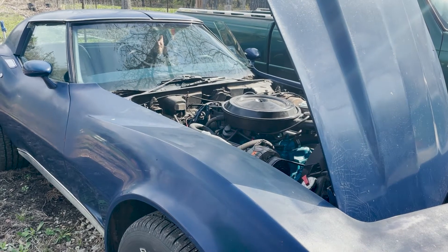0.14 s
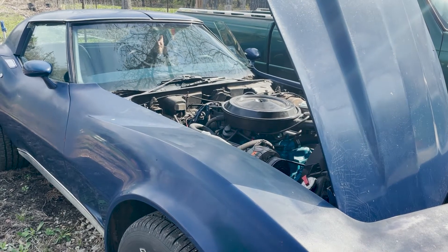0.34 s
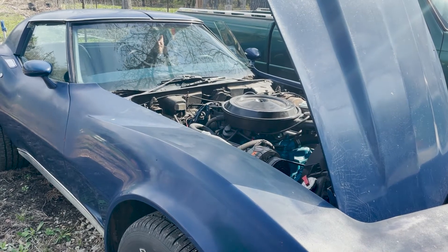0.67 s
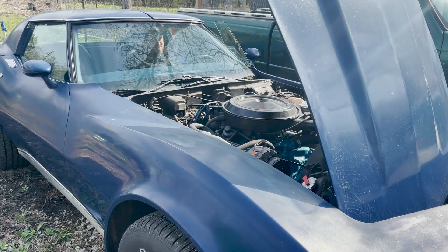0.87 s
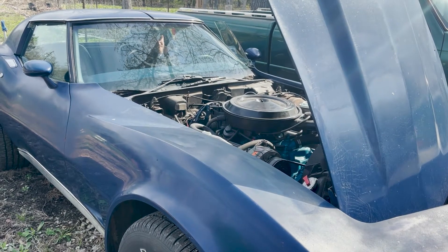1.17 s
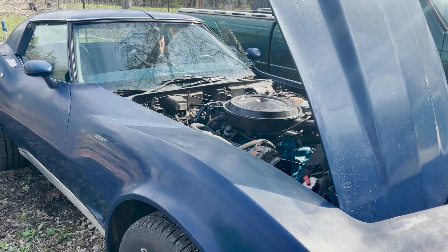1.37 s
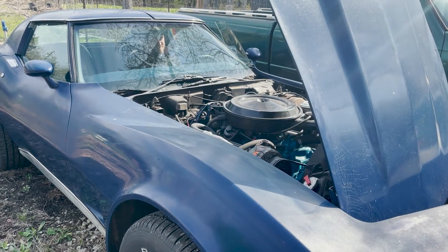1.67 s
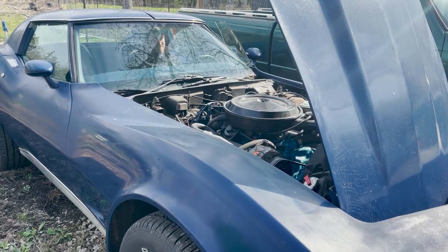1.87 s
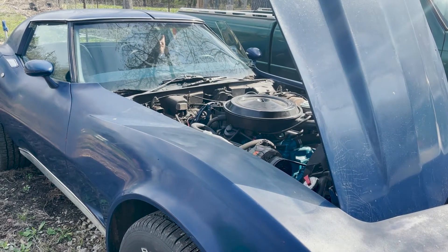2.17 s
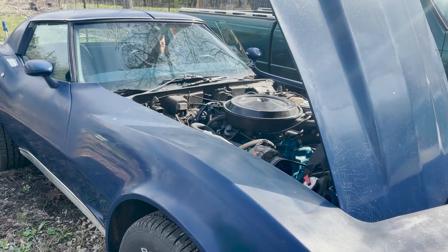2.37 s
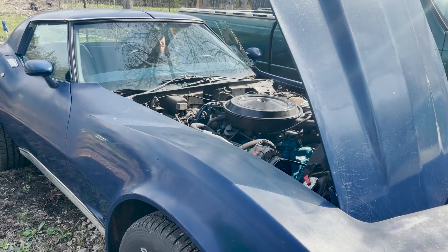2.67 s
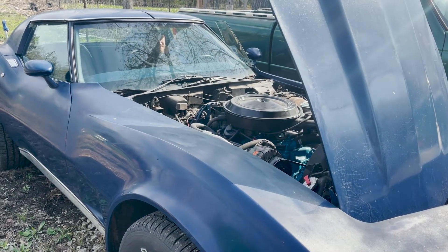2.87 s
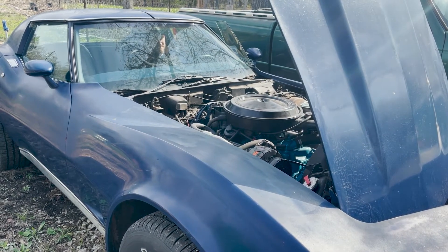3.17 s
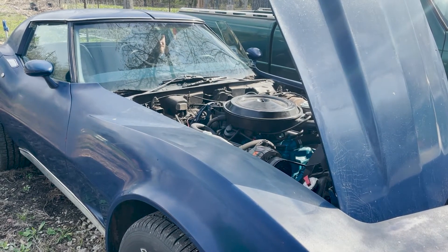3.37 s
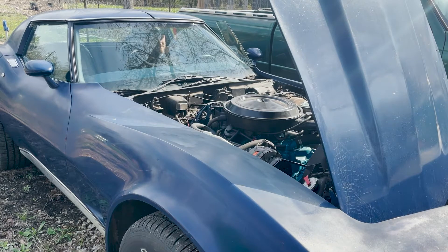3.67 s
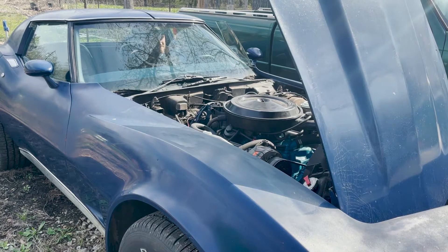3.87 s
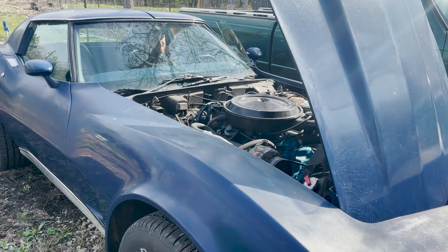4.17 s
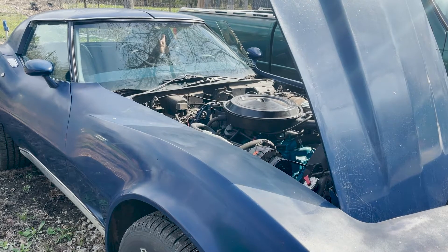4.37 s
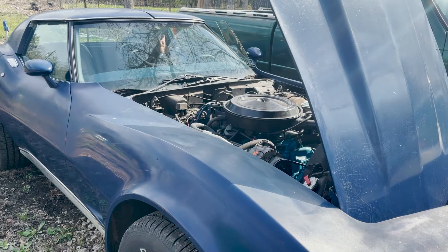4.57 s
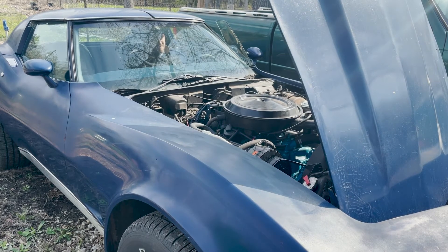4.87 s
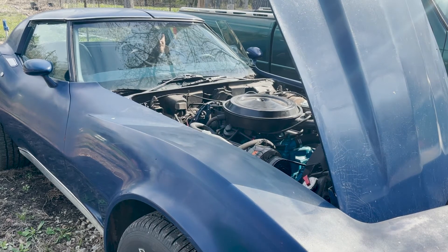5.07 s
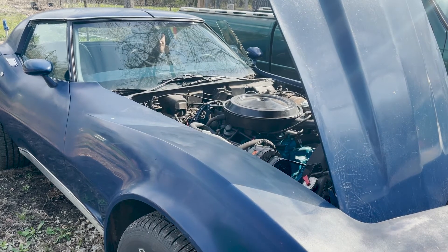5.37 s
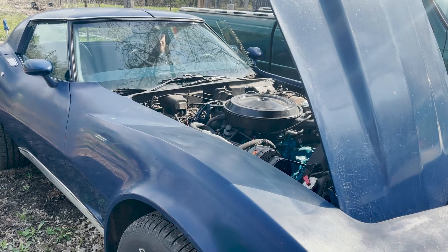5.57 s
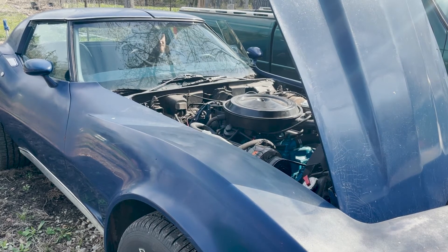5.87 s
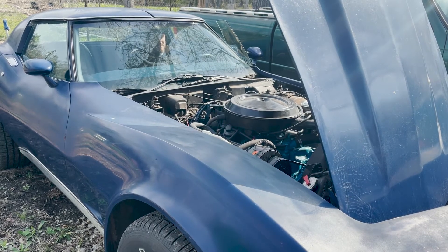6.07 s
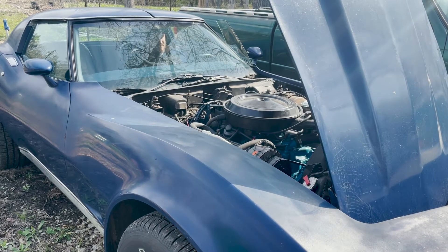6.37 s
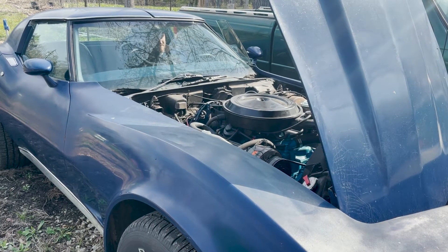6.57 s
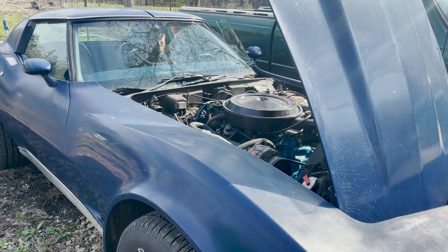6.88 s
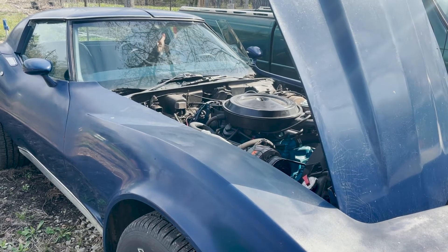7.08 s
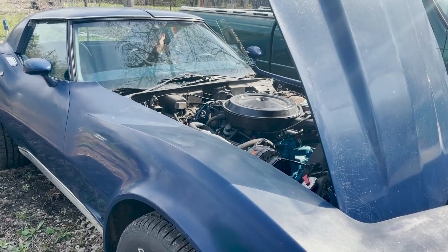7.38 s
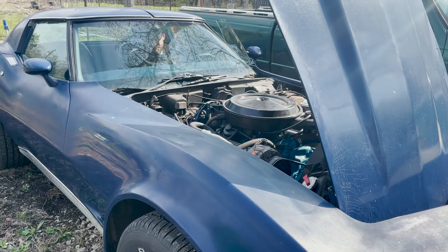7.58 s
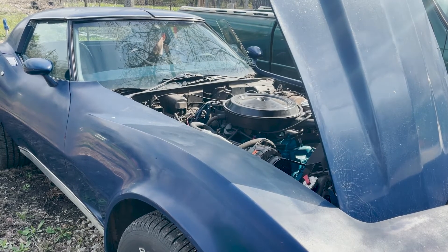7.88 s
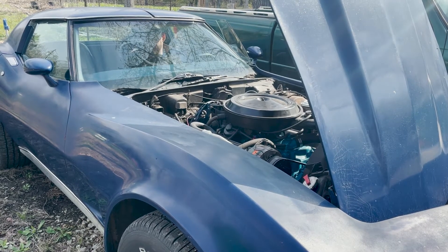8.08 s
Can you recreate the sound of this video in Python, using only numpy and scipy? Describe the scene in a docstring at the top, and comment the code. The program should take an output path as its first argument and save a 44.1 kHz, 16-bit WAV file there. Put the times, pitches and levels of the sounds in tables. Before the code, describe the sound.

A big petrol V8 idles roughly, stumbles and knocks, nearly stalls, then catches with two throttle blips.

```python
"""A yard, a phone's two microphones a few metres from a big petrol eight-cylinder with its hood open.
It idles unevenly from the start: exhaust pulses boom in the pipes, the block clatters, the carburettor
hisses and the valve gear taps. It stumbles on weak cylinders, sags and spits near 2 s, and picks up.
Then it sinks again, a slack lifter knocking, and nearly stalls just after 6 s. Two throttle blips,
near 6.6 and 7.4 s, catch it and set the hood drumming."""
import sys
import numpy as np
from scipy import signal
from scipy.fft import rfft, irfft
from scipy.io import wavfile
from scipy.ndimage import uniform_filter1d

SR = 44100
rng = np.random.default_rng(int(sys.argv[2]) if len(sys.argv) > 2 else 0)


def digitize_waveform(pressure):
    """Quantize a signal to 16-bit integers and store it at the path in sys.argv[1].

    Rows of a 2-D input are taken as channels; values are limited to [-1, 1].
    """
    field = np.atleast_2d(pressure).T
    bounded = np.clip(field, -1, 1)
    quanta = np.round(bounded * 32767).astype(np.int16)
    wavfile.write(sys.argv[1], SR, quanta)


N = 363384
TIME = np.arange(N) / SR
BIN_HZ = np.maximum(np.fft.rfftfreq(N, 1 / SR), 1)
IDLE_HZ = 47  # firings a second


def undb(db):
    """Decibels to gain."""
    return 10 ** (np.asarray(db) / 20)


def unit(x):
    """Scale to rms 1."""
    return x / np.sqrt(np.mean(x ** 2))


def over_time(table):
    """A (time, value) table read at every sample."""
    return np.interp(TIME, *np.transpose(table))


def over_hz(table):
    """A (frequency, value) table read at every frequency bin."""
    hz, value = np.transpose(table)
    return np.interp(np.log(BIN_HZ), np.log(np.maximum(hz, 1)), value)


def shaped(x, gain):
    """Multiply the spectrum by a gain a bin."""
    return irfft(rfft(x) * gain, N)


def noise(colour):
    """Noise of rms 1, coloured by a gain a bin."""
    return unit(shaped(rng.standard_normal(N), colour))


def lowpass(hz):
    """Complex response of a one-pole low-pass."""
    return 1 / (1 + 1j * BIN_HZ / hz)


def highpass(hz):
    """Complex response of a one-pole high-pass."""
    return 1 - lowpass(hz)


def resonance(hz, width_hz):
    """Complex response of a band-pass, gain 1 at the centre."""
    return 1 / (1 + 1j * (BIN_HZ ** 2 - hz ** 2) / (BIN_HZ * width_hz))


def modes(table):
    """Sum of resonances with alternating sign."""
    return sum((-1) ** k * undb(db) * resonance(f, w) for k, (f, w, db) in enumerate(table))


def walk(rate):
    """Random levels held 1 / rate s and smoothed twice; rms 1."""
    hold = int(SR / rate)
    steps = np.repeat(rng.standard_normal(N // hold + 1), hold)
    return unit(uniform_filter1d(uniform_filter1d(steps, hold), hold)[:N])


def bursts(events, rise_s, fall_s, samples):
    """An envelope that jumps and dies away at each (time, level) row."""
    envelope, t = np.zeros(N), TIME[:samples]
    for s, db in events:
        envelope[int(s * SR):][:samples] += undb(db) * (1 - np.exp(-t / rise_s)) * np.exp(-t / fall_s)
    return envelope


def crossings(cycles):
    """Samples at which a running count passes a whole number."""
    return np.flatnonzero(np.diff(np.floor(cycles)))


def pull(hz):
    """How hard the engine pulls, 0-1: follows the crank's gain in speed, a little late."""
    lag_s, hard_hz_per_s = .091, 116
    keep = np.exp(-1 / (lag_s * SR))
    acceleration = signal.lfilter([1 - keep], [1, -keep], np.gradient(hz) * SR)
    return np.tanh(np.maximum(acceleration, 0) / hard_hz_per_s)


def cylinders(hz, firings):
    """A pressure pulse per firing, weaker and less even as the engine sags."""
    # exhaust thumps fall slightly later from about 5 to 6 s: (time [s], delay [firing intervals])
    thump_delay = [(4.75, 0), (4.95, 0.42), (6.0, 0.434), (6.12, 0)]
    # cylinders in firing order: (burn strength [dB])
    cylinder_db = [0.6, -1.5, 0.6, 0.4, 2, 0.3, -2.6, 1.5]
    # firings that barely burn: (middle time [s], run length [firings], loss [dB])
    misfires = [(.643, 0.92, 12), (1.085, 1.2, 11), (1.279, 0.65, 15), (1.343, 0.74, 10), (1.47, 0.5, 33),
                (1.61, 0.89, 29), (1.774, 1.15, 30), (1.835, 1.4, 9), (2.02, 2.6, 8), (2.175, 2.5, 4.5),
                (2.285, 4.3, 9), (2.631, 1.4, 9), (2.966, 0.89, 11), (3.609, 1.06, 21), (3.781, 1.14, 15),
                (3.863, 0.71, 8), (4.135, 1.03, 16), (4.318, 1.46, 17), (4.618, 1.2, 9), (4.945, 1.4, 8),
                (5.045, 2, 9), (5.2, 3.3, 6), (5.32, 1.4, 8), (5.425, 0.8, 4), (5.53, 2.1, 4),
                (5.675, 2.7, 10), (5.89, 0.91, 7), (5.965, 0.72, 8), (6.085, 2.8, 15), (6.3, 0.8, 7),
                (6.4, 3.6, 11.5), (6.875, 3.1, 18), (6.995, 5.8, 8), (7.475, 1.4, 2), (7.85, 1.8, 8),
                (8.035, 1.9, 9)]
    lead, weak_cylinder = .65, 6  # lead: firing intervals ahead of the valve gear
    at = crossings(firings + lead - over_time(thump_delay))
    cylinder = np.arange(len(at)) % 8
    size_draw, delay_draw = rng.standard_normal((N // 200, 2))[:len(at)].T
    # with the throttle shut at speed every other cylinder starves
    overrun = np.clip(-np.gradient(uniform_filter1d(hz, 2000))[at] * SR / 95, 0, 1) ** 3
    sag = np.clip((45 / hz[at]) ** 6, .3, 3.6) + .3 * overrun
    size_db = np.array(cylinder_db)[cylinder] - .6 * sag * abs(size_draw)
    size_db -= 7.3 * overrun * (cylinder % 2)
    size_db -= np.minimum(sag, 1.05) * (cylinder == weak_cylinder)
    for s, missed, loss_db in misfires:
        size_db -= loss_db * np.exp(-((at / SR + .013 - s) * hz[at] / (missed / 2 + .31)) ** 4)
    jitter = (.016 * sag * delay_draw * SR / hz[at]).astype(int)
    pulses = np.zeros(N)
    pulses[np.clip(at + jitter, 0, N - 1)] = undb(size_db) / np.sqrt(hz[at])
    return pulses


def exhaust_level(hz):
    """Exhaust gain in dB: fuller under pull, starved when slow, eased near the pitch of the pipes."""
    ease_db = 3.5 * np.exp(-((hz - 79) / 4) ** 2)
    starve_db = .57 * np.maximum(40 - hz, 0) * (1 - pull(hz))
    return -19 + 5.5 * pull(hz) - ease_db - starve_db


def exhaust(hz, firings):
    """Firing pulses ring the pipes, and each slug of gas tumbles through the muffler chambers."""
    # boom of the long pipes: (frequency [Hz], width [Hz], level [dB])
    pipe_modes = [(36.6, 20, 1.5), (83.1, 21.9, 10), (207.5, 20.5, 1)]
    # sharp pulses that pass the muffler at speed: (frequency [Hz], width [Hz], level [dB])
    bark_modes = [(206, 26, -2.5), (320, 60, -7)]
    # muffler chambers: (frequency [Hz], width [Hz], level [dB])
    chamber_modes = [(75, 50, -14), (152, 38, -13)]
    pulses = cylinders(hz, firings)
    boom = unit(shaped(pulses, modes(pipe_modes) * lowpass(120) ** 4 * highpass(24) ** 2))
    slow = np.clip((41 - hz) / 8, 0, 1)  # slow burns give rounder thumps
    boom += slow * (undb(2) * uniform_filter1d(boom, size=200) - boom)
    bark = undb(-9 + .66 * (hz - 99.5)) * unit(shaped(pulses, modes(bark_modes)))
    gas = (.3 + unit(shaped(pulses, lowpass(12)))) * rng.standard_normal(N)
    tumble = shaped(unit(gas), 20.6 * modes(chamber_modes) * highpass(34.5) ** 3)
    tumble *= undb(-.15 * np.maximum(hz - 60, 0))  # thins out at speed
    return (boom + bark + tumble) * undb(exhaust_level(hz))


def clatter_level(hz):
    """Block gain in dB: climbs with speed and pull, drops while coasting."""
    speed_db = .3223 * (np.minimum(hz, 95) - IDLE_HZ)
    coast_db = .0149 * np.minimum(np.gradient(uniform_filter1d(hz, size=4000)) * SR, 0)
    return -36 + speed_db + 2 * pull(hz) + coast_db


def load(hz):
    """Engine load, as dB of clatter above its median."""
    clatter_db = clatter_level(hz)
    return clatter_db - np.median(clatter_db)


def block(hz, firings):
    """Pistons, chain and fan: noise in the panels, throbbing with firings and cam turn."""
    # clatter at idle: (frequency [Hz], relative level [dB])
    clatter_spectrum = [(90, 7.5), (190, 3.5), (250, 3), (420, -0.5), (1000, -4.5), (1180, -9.5),
                        (1500, -10.5), (2500, -11), (4000, -18.5), (7000, -24)]
    # peaks and dips of the panels: (frequency [Hz], width [Hz], gain [dB])
    panels = [(488, 120, 3), (950, 23, 3), (1307, 160, 4), (400, 58, -3.5), (261, 25, -8)]
    panel_db = sum(db * abs(resonance(f, w)) ** 2 for f, w, db in panels)
    throb = 1 + .5 * np.exp(-(firings % 1) / .81) + .029 * np.cos(2 * np.pi * firings / 8)
    clatter = shaped(throb * rng.standard_normal(N), undb(over_hz(clatter_spectrum) + panel_db))
    clatter /= np.std(shaped(clatter, (BIN_HZ > 200) & (BIN_HZ < 2500)))
    spectrum = rfft(clatter)
    out, load_db = 0, load(hz)
    for octave in np.arange(-3.5, 3.6, .5):  # bands around 1 kHz
        off_centre = np.clip((np.log2(BIN_HZ / 1000) - octave) * np.pi, -np.pi / 2, np.pi / 2)
        band = irfft(spectrum * np.cos(off_centre) ** 2, N)
        flicker_db = .4 * walk(9) + 1.2 * walk(25)
        tilt_db = -.1364 * max(octave, -1.5) * load_db  # darker under load
        body_db = -.14 * (octave < -.6) * np.minimum(load_db, 0)  # the lows fade less as it sags
        out = out + band * undb(tilt_db + flicker_db + body_db)
    return out * undb(clatter_level(hz))


def hood(hz):
    """The raised hood and fenders drum along, harder with load."""
    # sheet metal: (frequency [Hz], width [Hz], level [dB])
    hood_modes = [(213, 21.6, -0.5), (302.8, 17.2, 6), (353.6, 11.7, 1.5), (601, 88, -4.5), (1766, 63, -10)]
    load_db = load(hz)
    drum_db = -37.5 + 13.5 * np.tanh(load_db / 11) + 1.8 * np.minimum(load_db + 2.5, 0)
    return noise(modes(hood_modes)) * undb(drum_db + 2 * walk(12))


def carburettor(hz, firings):
    """Air hisses past the throttle plates, tugged by each intake stroke, with sudden spits."""
    # rushing air: (frequency [Hz], relative level [dB])
    hiss_spectrum = [(2500, -56), (4000, -7.5), (5400, -10.5), (6700, -2), (8700, 2.5), (10500, 0.5),
                     (11500, -1.5), (13300, 3), (14500, 2.5), (15800, -13)]
    # gulps as the throttle opens: (time [s], rise [s], fall [s], boost [dB])
    gulps = [(6.57, 0.086, 0.13, 9.5), (7.33, 0.22, 0.16, 3.5)]
    # the draw chokes off as the crank falters: (start [s], length [s], depth [dB])
    chokes = [(1.948, 0.11, 4.5), (6.062, 0.19, 12), (6.243, 0.15, 2.5), (6.378, 0.03, 19)]
    # gas spits at the intake: (time [s], level [dB])
    spits = [(2.0627, -30), (2.3246, -32), (2.3694, -32), (2.4495, -31.5), (2.495, -35), (6.116, -37),
             (6.1549, -40), (6.186, -34.5), (6.239, -38), (6.292, -45), (6.4073, -34), (6.463, -32),
             (6.532, -24), (6.562, -22), (6.678, -25)]
    # their colour: (frequency [Hz], relative level [dB])
    spit_spectrum = [(1500, 5), (3800, 2.5), (7000, -1.5), (13500, -2), (15800, -27)]
    hiss_db, choke_edge_s = -41 + .0327 * (hz - IDLE_HZ), .0077
    for s, rise_s, fall_s, boost_db in gulps:
        hiss_db += boost_db * np.exp(-((TIME - s) / np.where(TIME < s, rise_s, fall_s)) ** 2)
    for s, length_s, depth_db in chokes:
        hiss_db -= depth_db * np.clip(np.minimum(TIME - s, s + length_s - TIME) / choke_edge_s, 0, 1)
    flow = undb(hiss_db + 1.53 * walk(23)) * (1 + .092 * np.cos(2 * np.pi * firings))
    air = flow * noise(undb(over_hz(hiss_spectrum)))
    puffs = bursts(spits, rise_s=.003, fall_s=.013, samples=SR // 8)
    return air + puffs * noise(undb(over_hz(spit_spectrum)))


def engine_bay(hz, firings):
    """Block, hood and carburettor, their noise drawn afresh on every call."""
    return block(hz, firings) + hood(hz) + carburettor(hz, firings)


def valves(hz, firings):
    """Every valve seats once a cam turn: sixteen uneven ticks that ring the covers."""
    # valve covers: (frequency [Hz], width [Hz], level [dB])
    cover_modes = [(1059, 31, 6.5), (1308, 117, -1), (1757, 36, -5), (2785, 120, -10), (4020, 560, -19),
                   (12500, 4900, -28)]
    at = crossings(2 * firings)
    delay_draw, size_draw = rng.standard_normal((N // 100, 2))[:len(at)].T
    seats = np.zeros(N)
    seats[np.clip(at + (90 * delay_draw).astype(int), 0, N - 1)] = undb(5.5 * np.clip(size_draw, -2, 2))
    chatter = shaped(seats, lowpass(27) ** 2) * rng.standard_normal(N)  # some milliseconds a seat
    return unit(shaped(chatter, modes(cover_modes))) * undb(-43 + .06 * load(hz))


def blows(cycles, place, db, scatter_db):
    """Rows (time [s], level [dB]): one blow a cycle, at a place 0-1 within it."""
    at = crossings(cycles - place)
    return np.transpose([at / SR, db[at] + scatter_db * rng.standard_normal(len(at))])


def struck(events, ring_modes):
    """Each blow is a short crack that rings the metal, a little differently every time."""
    rise_s, crack_s, crack_db = .003, .0076, -7
    out, t = np.zeros(N + SR), TIME[:SR // 10]
    draws = rng.standard_normal((len(events), len(ring_modes), 3))
    cracks = noise(resonance(990, 3300))[:len(events) * 600].reshape(-1, 600)
    for (s, peak_db), draw, crack in zip(events, draws, cracks):
        ring = np.zeros(len(t))
        for (hz, db, t60), (detune, strength, phase) in zip(ring_modes, draw):
            tone = np.sin(2 * np.pi * (hz * (1 + .008 * detune) * t + phase))
            ring += tone * undb(db + 1.5 * strength - 60 * t / t60)
        ring[:600] += undb(crack_db) * crack * np.exp(-t[:600] / crack_s)
        ring *= 1 - np.exp(-t / rise_s)
        out[int(s * SR):][:len(t)] += undb(peak_db) * ring / abs(ring).max()
    return out[:N]


def rocker_and_lifters(hz, firings):
    """A loose rocker taps and bounces each cam turn; a lifter knocks as oil pressure sinks with speed."""
    # ring of the rocker: (frequency [Hz], level [dB], time to fall 60 dB [s])
    tap_modes = [(1495, 0, .09), (1290, -10, .05), (1010, -8, .06)]
    # ring of the lifters: (frequency [Hz], level [dB], time to fall 60 dB [s])
    knock_modes = [(1780, -1.5, .055), (1015, 0, .07), (1560, -6, .04), (1300, -7, .04), (2350, -8, .03)]
    # the hardest knocks, near the stall: (time [s], level [dB])
    hard_knocks = [(4.917, -27), (5.155, -26), (5.398, -24.5), (5.663, -27), (5.948, -24.5), (6.241, -24),
                   (6.388, -27)]
    cam_turns, pull_db = firings / 8, 2 * pull(hz)
    tap_db = -28 + pull_db + .3 * (np.minimum(hz, 52) - IDLE_HZ)
    bounce_db = -35.5 + pull_db + .9 * np.clip(38 - hz, 0, 6)  # lands harder when slow
    knock_db = -26 + pull_db - .5 * np.maximum(hz - 32.8, 0)
    taps = blows(cam_turns, place=.975, db=tap_db, scatter_db=1)
    bounces = blows(cam_turns, place=.095, db=bounce_db, scatter_db=1)
    knocks = blows(cam_turns, place=.73, db=knock_db, scatter_db=1.5)
    gap_s = abs(knocks[:, :1] - np.array(hard_knocks)[:, 0]).min(axis=1)
    knocks = np.vstack([knocks[gap_s > .05], hard_knocks])  # no knock sounds twice
    rattle = blows(firings, place=.57, db=knock_db - 15, scatter_db=3.5)  # slack lifters, every firing
    rattle = rattle[rattle[:, 1] > -43]  # fainter ones are lost in the clatter
    rocker = struck(np.vstack([taps, bounces]), tap_modes)
    return rocker + struck(np.vstack([knocks, rattle]), knock_modes)


def steel_ticks():
    """Stray sharp ticks in the valve gear: a few milliseconds of chatter ring small steel parts."""
    # ticks: (time [s], level [dB])
    ticks = [(1.138, -30.5), (1.479, -30), (1.853, -33), (2.066, -33), (2.265, -36), (2.496, -29),
             (2.64, -34), (2.683, -30.5), (2.849, -34), (3.287, -39)]
    # small steel parts: (frequency [Hz], width [Hz], level [dB])
    steel_modes = [(2550, 300, 0.5), (3760, 210, 4.5), (4630, 500, 1), (5350, 400, -1), (6800, 1000, -5.5)]
    return bursts(ticks, rise_s=.0015, fall_s=.006, samples=SR // 20) * noise(modes(steel_modes))


def scene():
    """Two microphones a few metres off hear the engine directly, plus sound scattered in the yard."""
    # crank speed: (time [s], firing rate [Hz])
    speed = [(0, 64.24), (.481, 59), (.882, 52.29), (1.311, 47.83), (2.235, 34.11), (2.797, 48.82),
             (3.17, 51.24), (3.822, 45.7), (4.209, 43.58), (4.711, 36.75), (5.47, 30.68), (6.224, 26.47),
             (6.404, 30.38), (6.532, 47.73), (6.649, 75.96), (6.75, 81), (6.85, 80), (7.03, 68),
             (7.24, 84.5), (7.43, 103), (7.5, 102), (7.75, 79.5), (8.24, 78.7)]
    # scattered sound: (frequency [Hz], level against direct [dB])
    scatter_spectrum = [(60, -6), (250, -15.5), (700, -6.5), (1900, -9.5), (3000, -6.5), (6000, -6.5),
                        (8800, -35), (10500, 0.5), (14000, -23)]
    # balance of the microphones: (frequency [Hz], left minus right [dB])
    mic_balance = [(250, -1), (700, .2), (1500, -.2), (4400, 1.5), (8000, 0)]
    # phase between the microphones: (frequency [Hz], left lead [rad])
    mic_phase = [(1460, -.2), (2600, .7), (2930, 1.3), (4600, .1), (5300, .6), (5770, -1.9), (6630, -1.1),
                 (7670, -2.7), (8800, -3.14), (9730, -3.9), (13200, -6.2), (15400, -6.3)]
    hz = over_time(speed)
    firings = np.cumsum(hz) / SR  # running count, eight to a cam turn
    direct = exhaust(hz, firings) + engine_bay(hz, firings)
    direct += rocker_and_lifters(hz, firings) + valves(hz, firings) + steel_ticks()
    scattered = shaped(engine_bay(hz, firings), undb(over_hz(scatter_spectrum)))
    left_mic = undb(over_hz(mic_balance) / 2) * np.exp(.5j * over_hz(mic_phase))
    return np.array([shaped(direct + scattered, left_mic), shaped(direct - scattered, 1 / left_mic)])


def record(dry):
    """The phone rounds the loudest peaks and cuts the top."""
    top_cut = signal.ellip(10, .2, 70, 15750, fs=SR, output="sos")
    return signal.sosfilt(top_cut, np.tanh(1.1 * dry) / 1.1)


dry = scene()
out = record(dry)
digitize_waveform(out)
```